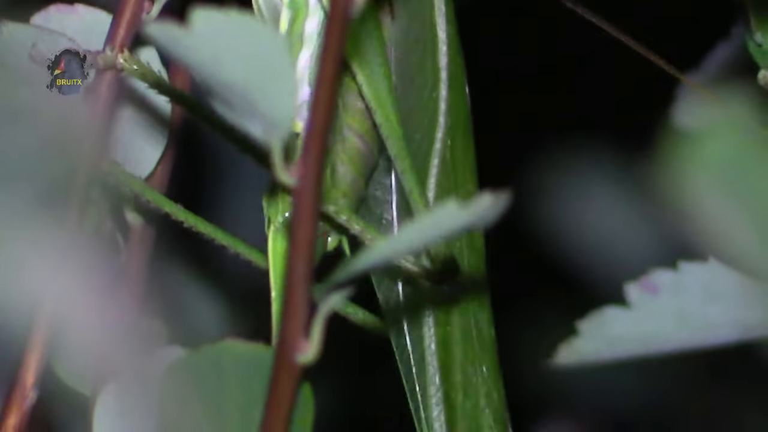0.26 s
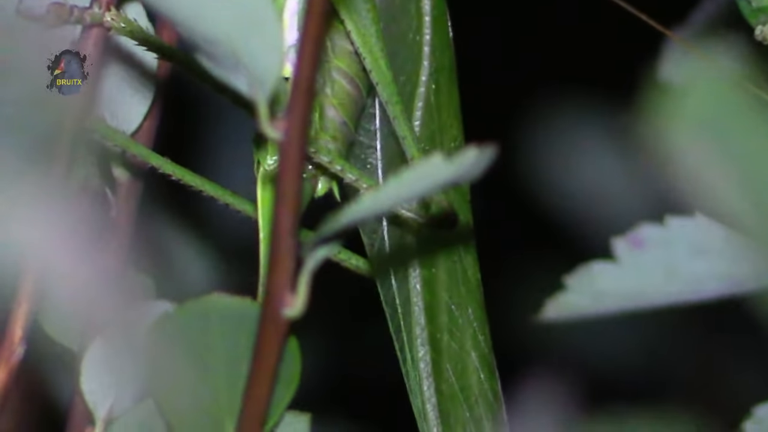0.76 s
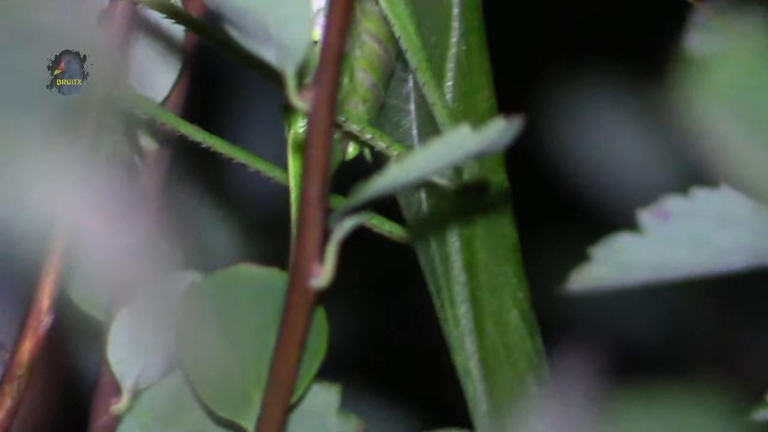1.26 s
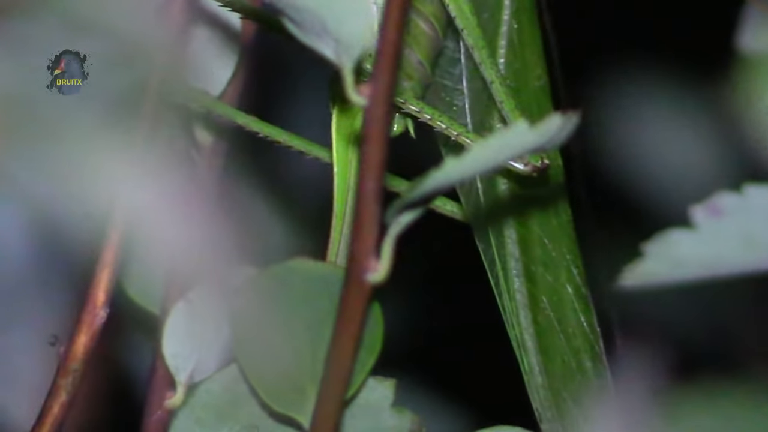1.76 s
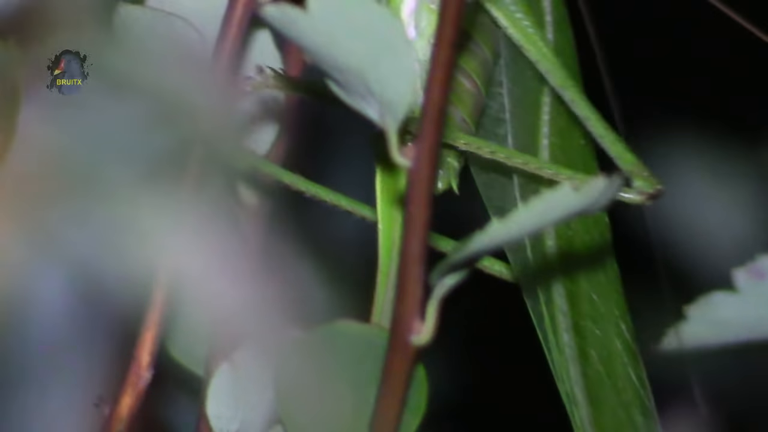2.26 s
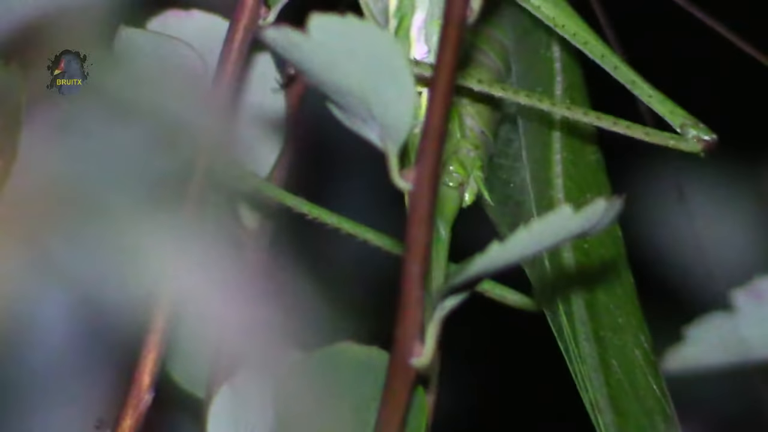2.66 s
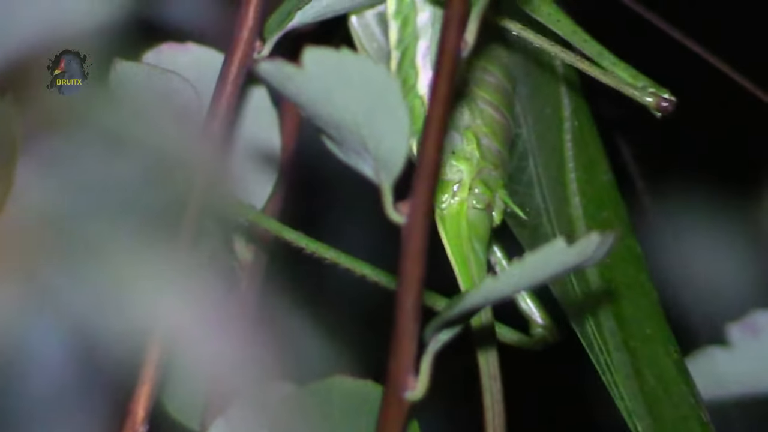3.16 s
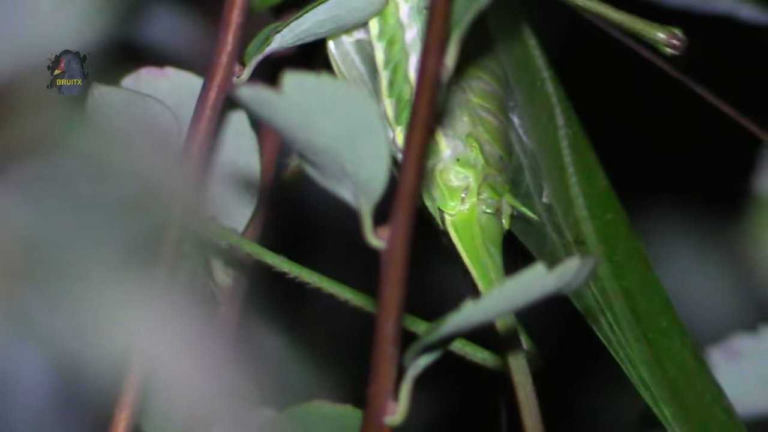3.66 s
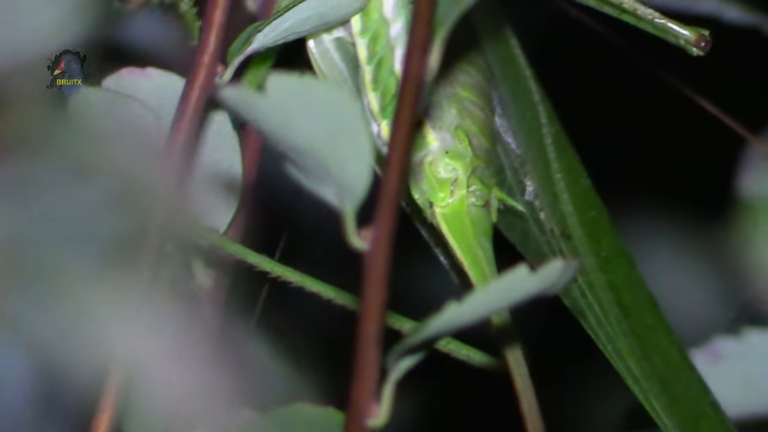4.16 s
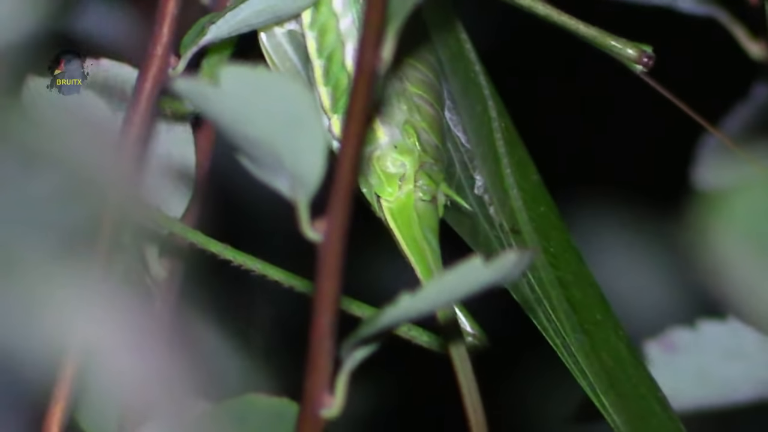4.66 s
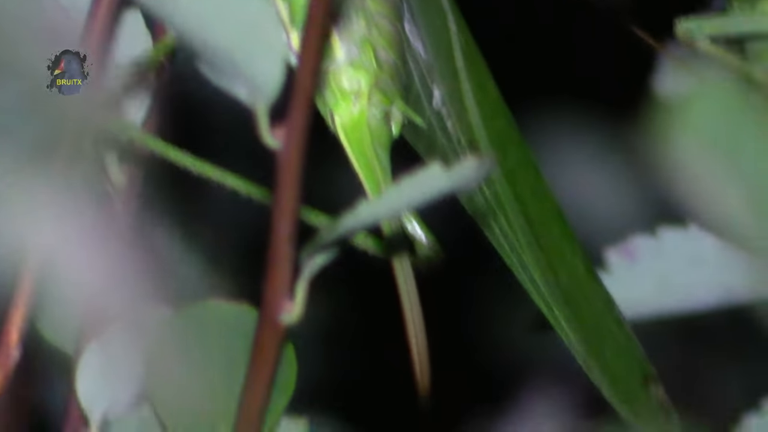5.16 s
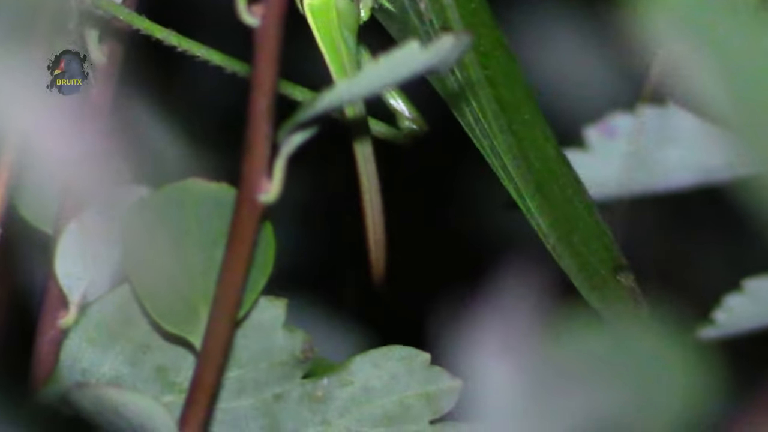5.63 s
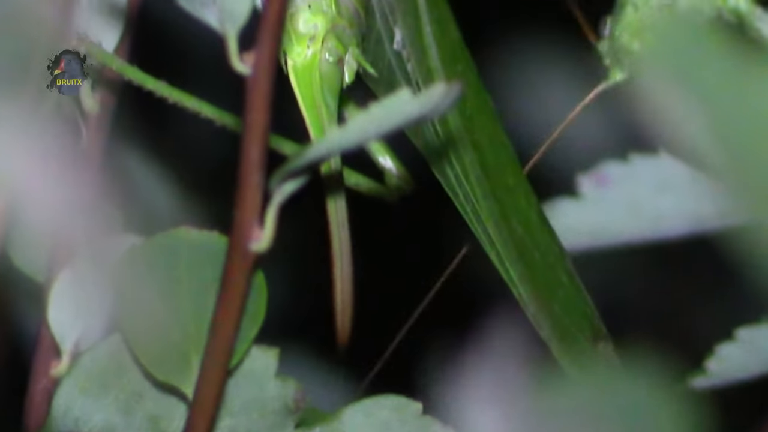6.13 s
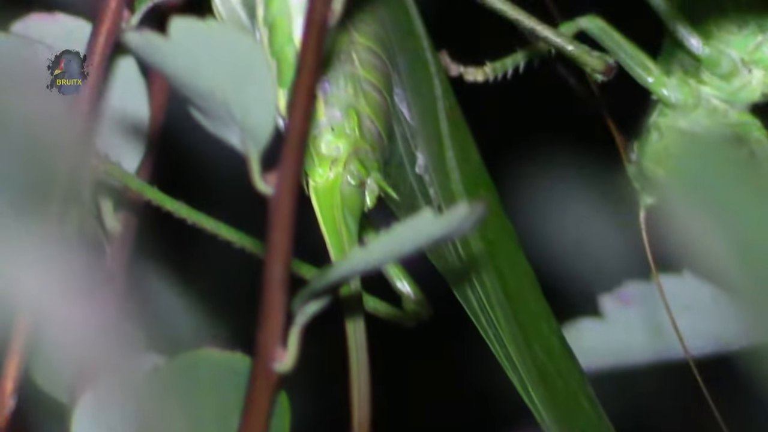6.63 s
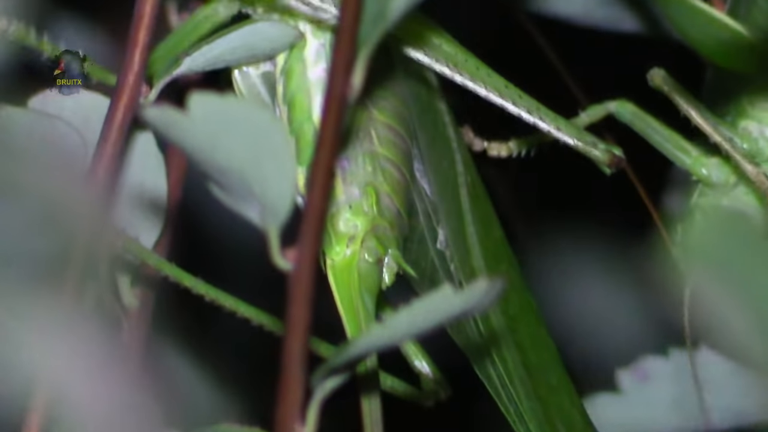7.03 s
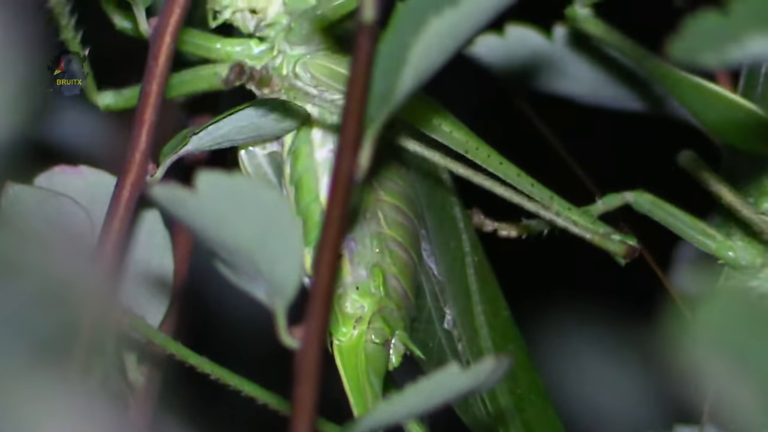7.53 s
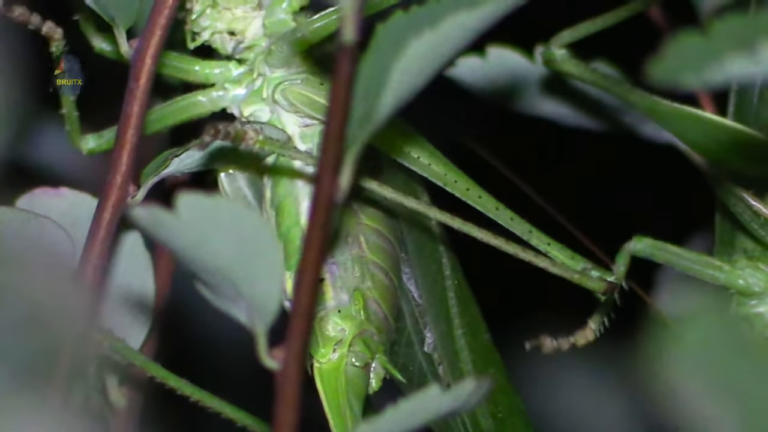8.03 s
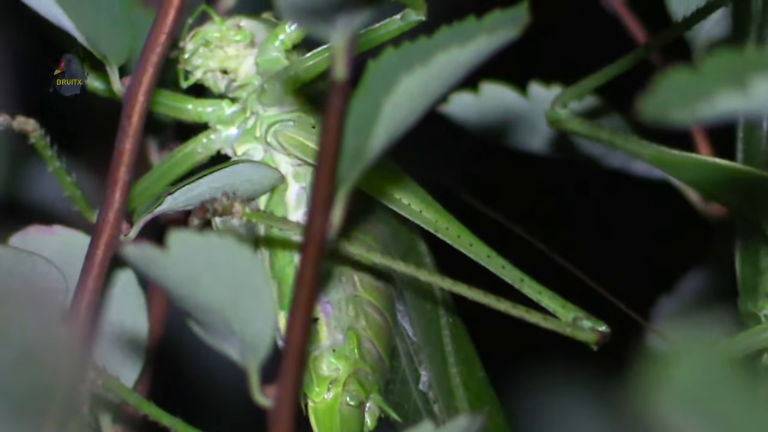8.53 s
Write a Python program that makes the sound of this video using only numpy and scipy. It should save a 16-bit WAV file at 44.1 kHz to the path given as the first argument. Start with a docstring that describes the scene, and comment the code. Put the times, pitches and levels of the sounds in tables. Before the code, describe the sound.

Night hedge insects: eight blasting paired rasps right at the microphone, then steady faint high buzzing with low, pure pulsing chirps that grow stronger.

```python
"""A bush-cricket right at the microphone rasps eight double strokes and stops, in a hedge at night; another
keeps on further off. Their rasps are scraper snaps on a toothed file, sent through a resonant wing.
Cone-head bush-crickets hold a high buzz of fused strokes; a tree cricket trills in soft, pure tone pulses.
Foliage scatters every song as decaying noise. A few faint twig ticks are knocks of banded noise.
A low distant rumble and a thin hiss, both shaped noise, lie under it all."""
import sys
import numpy as np
from scipy import signal
from scipy.fft import rfft, irfft, next_fast_len
from scipy.io import wavfile
from scipy.ndimage import uniform_filter1d, map_coordinates

SR = 44100
rng = np.random.default_rng(int(sys.argv[2]) if len(sys.argv) > 2 else 0)


def file_out(sig):
    """Save sig as 16-bit WAV at sys.argv[1]."""
    # one column per channel
    cols = np.atleast_2d(sig).T
    # limit, then scale
    lim = np.clip(cols, -1, 1)
    pcm = np.round(lim * 32767).astype(np.int16)
    wavfile.write(sys.argv[1], SR, pcm)


N = 387638  # length in samples
T = np.arange(N) / SR  # time in seconds


def amp(db):
    """Decibels to gain."""
    return 10 ** (np.asarray(db) / 20)


def unit(x):
    """Scaled to rms 1."""
    return x / np.sqrt(np.mean(x ** 2) + 1e-20)


def wobble(per_s):
    """A smooth random curve with the given number of random knots per second."""
    knots = rng.standard_normal(int(N * per_s / SR) + 4)
    return map_coordinates(knots, [T * per_s])


def ring(x, points, modes=()):
    """x through a causal, minimum-phase body with a (Hz, dB) response and sharp modes on top."""
    size = 2 * next_fast_len(N // 2 + SR // 4)
    hz = np.fft.rfftfreq(size, 1 / SR) + 1  # kept off zero for the logarithm
    f, db = np.transpose(points)
    # outside the listed range the response falls 40 dB per octave, by 60 dB at most
    inside = np.minimum(hz / f[0], f[-1] / hz).clip(None, 1)
    skirt = np.maximum(40 * np.log2(inside), -60)
    db = np.interp(np.log(hz), np.log(f), db) + skirt
    for centre, width, lift in modes:
        db = db + lift / (1 + (2 * (hz - centre) / width) ** 2)
    # folding the cepstrum forward gives the phase of a causal body
    cepstrum = irfft(np.log(amp(db)))
    cepstrum[1:size // 2] *= 2
    cepstrum[size // 2 + 1:] = 0
    response = np.exp(rfft(cepstrum))
    return irfft(rfft(x, size) * response)[:N]


def since(times):
    """Seconds from the nearest of the given moments (negative before it), and its index."""
    midpoints = (times[1:] + times[:-1]) / 2
    index = np.searchsorted(midpoints, T)
    return T - times[index], index


def beats(start, period, tire, count):
    """Times of a run of wing strokes that slows towards its end."""
    k = np.arange(count)
    return start + period * k * (1 + tire * (k / k[-1]) ** 2)


def strokes(times, width, edge, scatter_db):
    """Pressure of the scraper on the file: one rounded hump, width in seconds, per wing stroke."""
    dt, index = since(times)
    strength = amp(rng.normal(0, scatter_db, len(times)))
    return strength[index] / (1 + np.abs(2 * dt / width) ** edge)


def teeth(per_s, jitter, scatter_db):
    """The scraper snaps from tooth to tooth at an uneven rate and strength."""
    draws = rng.standard_normal((int(2 * per_s * N / SR), 2))
    gaps = np.exp(jitter * draws[:, 0])
    at = (np.cumsum(gaps) * SR / per_s).astype(int)
    snaps = amp(scatter_db * draws[:, 1])
    return unit(np.bincount(at, snaps, N)[:N])


def foliage(x, t60, delay):
    """Diffuse scatter from leaves and ground, drifting as the microphone moves."""
    t = np.arange(SR // 2) / SR
    knots = np.linspace(0, T[-1], num=9)
    # one decaying noise tail per knot, crossfaded from each to the next
    tails = rng.standard_normal((len(knots), len(t))) * amp(-60 * t / t60) * (t > delay)
    tails /= np.linalg.norm(tails, axis=1, keepdims=True)
    shares = np.sqrt(np.clip(1 - np.abs(T - knots[:, None]) / knots[1], 0, 1))
    return signal.fftconvolve(x * shares, tails, axes=1)[:, :N].sum(0)


# Distant rumble under the night. Each row: frequency in Hz, relative density in dB per Hz.
RUMBLE_SPECTRUM = [(22, -16), (40, -3), (68, 0), (100, 0.5), (157, -7), (210, -8.5), (364, -12.5),
                   (700, -15), (1230, -17.5), (2400, -22)]
# Thin hiss around the microphone. Each row: frequency in Hz, relative density in dB per Hz.
HISS_SPECTRUM = [(1900, -27.5), (2500, -2), (3500, -3.5), (5000, -6), (7500, -8.5), (16000, -7)]


def night_air():
    """A far, gently wavering rumble under a thin even hiss, both shaped from white noise."""
    rumble_db = -43.5 + 0.3 * wobble(7.4)
    rumble = amp(rumble_db) * unit(ring(rng.standard_normal(N), RUMBLE_SPECTRUM))
    hiss = amp(-51.5) * unit(ring(rng.standard_normal(N), HISS_SPECTRUM))
    return rumble + hiss


# Cone-heads in the hedge. Each row: wing strokes per second, mean level in dB.
CONEHEADS = [(86.7, -44.5), (93.2, -48)]
# Their wing as it reaches the microphone. Each row: frequency in Hz, relative response in dB.
CONEHEAD_WING = [(11500, -32), (13100, -19), (13650, -3), (13900, -11), (14400, 1), (15000, -6),
                 (15700, -3.5)]


def coneheads():
    """Wing strokes so fast that they fuse into a buzz at the top of hearing."""
    buzz = np.zeros(N)
    for rate, db in CONEHEADS:
        times = np.arange(rng.random(), T[-1] * rate + 1) / rate
        scrape = teeth(per_s=6000, jitter=.3, scatter_db=2)
        rasp = strokes(times, width=0.0055, edge=4, scatter_db=0.5) * scrape
        rasp = rasp + amp(.8) * foliage(rasp, t60=0.21, delay=.003)
        buzz += amp(db + .15 * wobble(1.42)) * unit(ring(rasp, CONEHEAD_WING))
    return buzz


# Wing of the singer further off, heard through the hedge. Each row: frequency in Hz, relative response in dB.
FAR_WING = [(6500, -38), (8000, -22.5), (8850, -11.5), (9350, -1), (9700, 0.5), (10030, -0.5),
            (10400, -2.5), (10900, 0), (11400, -8), (12300, -13), (13500, -20), (16000, -25)]
# Its wing resonance, for the direct sound only. Each row: frequency in Hz, width in Hz, lift in dB.
FAR_WING_MODES = [(10060, 520, 12.5)]
# its almost tireless beat: first stroke (s), period (s), share by which it falls behind by the end
FAR_START_S, FAR_PERIOD_S, FAR_TIRE = .0045, .08862, .0009
FAR_SECOND_S = .028  # from the first closing of a double stroke to the second
FAR_DB, FAR_DRIFT_DB = -43, 0.1  # its rms level, and the size of its slow random drift


def far_bush_cricket():
    """Double closing strokes, about eleven pairs a second, blurred by scatter in the hedge."""
    first = beats(FAR_START_S, FAR_PERIOD_S, FAR_TIRE, count=100)
    second = first + FAR_SECOND_S
    pressure = strokes(first, width=0.013, edge=3.2, scatter_db=0.1)
    pressure = pressure + amp(-0.1) * strokes(second, width=0.012, edge=3.7, scatter_db=0.5)
    rasp = pressure * teeth(per_s=1800, jitter=.25, scatter_db=-1.5)
    direct = unit(ring(rasp, FAR_WING, FAR_WING_MODES))
    short_scatter = foliage(rasp, t60=0.082, delay=0.0022)
    long_scatter = amp(-2.5) * foliage(rasp, t60=0.43, delay=0.0084)
    scattered = unit(ring(short_scatter + long_scatter, FAR_WING))
    return amp(FAR_DB + FAR_DRIFT_DB * wobble(1)) * unit(direct + amp(-0.5) * scattered)


# Wing of the singer right at the microphone. Each row: frequency in Hz, relative response in dB.
NEAR_WING = [(300, -29.5), (1200, -39.5), (3500, -28), (5500, -30.5), (7200, -17), (8400, -2.5),
             (10000, -0.5), (11200, -3), (12300, -5.5), (13500, -14.5), (15500, -17.5)]
# Sharp resonances of that wing. Each row: frequency in Hz, width in Hz, lift in dB.
NEAR_WING_MODES = [(9210, 190, 6.1), (9710, 190, 3.4), (10350, 210, 12.4)]
# its beat: first stroke (s), period (s), share by which it falls behind by the end
NEAR_START_S, NEAR_PERIOD_S, NEAR_TIRE = .0228, .0853, .051
NEAR_SECOND_S = .03  # from the first closing of a double stroke to the second


def near_bush_cricket():
    """Short and long closing rasps in pairs, each rasp after a faint rising squeak as the wings open."""
    first = beats(NEAR_START_S, NEAR_PERIOD_S, NEAR_TIRE, count=8)
    second = first + NEAR_SECOND_S
    pressure = strokes(first, width=0.012, edge=3.5, scatter_db=1.0)
    pressure = pressure + strokes(second, width=0.016, edge=5.7, scatter_db=0.0)
    snaps = teeth(per_s=1450, jitter=.22, scatter_db=5.5)
    rasp = ring(pressure * snaps, NEAR_WING, NEAR_WING_MODES)
    # the rasp's overall level is set 3 dB under that of its pressure
    rasp *= amp(-3.0) * np.linalg.norm(pressure) / np.linalg.norm(rasp)
    song = rasp
    for opening in (first - .024, second - .016):
        dt = np.clip(since(opening)[0], -.01, .004)
        squeak_hz = 8000 + 170000 * dt + 380 * wobble(1500)
        rub = strokes(opening, width=0.0042, edge=3.7, scatter_db=5.5) * amp(1.9 * wobble(1100))
        song = song + amp(-21.5) * rub * np.sin(2 * np.pi * np.cumsum(squeak_hz) / SR)
    short_scatter = amp(-15.5) * foliage(song, t60=0.067, delay=.003)
    long_scatter = amp(-27) * foliage(song, t60=0.2, delay=0.019)
    return song + short_scatter + long_scatter


# Trills of the tree cricket beneath the others. Each row: first pulse in seconds, last pulse in seconds,
# full level in dB, dB by which it starts softer (negative: louder).
TRILLS = [(0.03, 0.34, -38.5, -2.5), (0.586, 1.156, -36.5, 0.5), (1.415, 2.13, -39.5, 0.5),
          (2.325, 2.955, -41.5, -0.5), (3.125, 3.784, -37.5, 3), (3.975, 4.638, -38, -1),
          (4.872, 5.662, -30, 13), (5.914, 6.514, -29.5, 3), (6.775, 7.371, -27, 3),
          (7.617, 8.149, -27.5, 0.5), (8.369, 8.774, -28, 2)]
TRILL_PERIOD = .0314  # nominal seconds from pulse to pulse
SWELL_S = 0.25  # time constant with which a trill reaches its full level


def trill_level():
    """Level in dB: each trill eases from its starting level to its own full strength."""
    start, _, full_db, soft_db = np.transpose(TRILLS)
    trill = np.searchsorted(start[1:] - TRILL_PERIOD, T)
    elapsed = np.maximum(T - start[trill], 0)
    return full_db[trill] - soft_db[trill] * np.exp(-elapsed / SWELL_S)


def tree_cricket():
    """Pure pulses, each sagging in pitch as the wing slows; the wider surroundings answer at a steady level."""
    times = []
    for start, end, _, _ in TRILLS:
        u = np.linspace(0, 1, round((end - start) / TRILL_PERIOD) + 1)
        # the beat tires through each trill
        times.extend(start + (end - start) * (u - .015 * u * (1 - u)))
    times = np.array(times)
    dt, pulse = since(times)
    dt = np.clip(dt, -TRILL_PERIOD / 2, TRILL_PERIOD / 2)
    pitch_hz = 2872 - 6500 * dt + 8 * wobble(5) + 16 * wobble(400)
    # the wing starts each stroke a little out of step with the last
    slip = uniform_filter1d(0.74 * rng.standard_normal(len(times))[pulse], size=100)
    phase = 2 * np.pi * np.cumsum(pitch_hz) / SR + slip
    pressure = strokes(times, width=0.016, edge=5.9, scatter_db=.5) * amp(0.95 * wobble(400))
    song = pressure * (np.sin(phase) + amp(-36) * np.sin(2 * phase))
    direct = amp(trill_level()) * song
    # two echoes land in the gaps between the pulses; only the near one follows the trill's level
    near_echo = amp(-21.5) * np.interp(T - .0175, T, direct, left=0)
    far_echo = amp(-46.0) * np.interp(T - .049, T, song, left=0)
    scatter = amp(-43.0) * foliage(song, t60=0.24, delay=0.0093)
    return direct + near_echo + far_echo + scatter


# Faint ticks of twigs and leaves. Each row: start in seconds, pitch in Hz, starting level in dB.
TICKS = [(2.375, 1520, -47.5), (4.97, 1560, -51), (6.008, 1000, -38)]


def twigs():
    """Small dry ticks, each a short damped knock of noise banded around its pitch."""
    t60 = .07  # seconds to fall by 60 dB
    out = np.zeros(N)
    for s, hz, db in TICKS:
        band = [(0.62 * hz, -3), (hz, 0), (1.2 * hz, -3)]
        knock = unit(ring(rng.standard_normal(N), band))
        out += amp(db - 60 * np.abs(T - s) / t60) * (T > s) * knock
    return out


def scene():
    """All the singers and the twigs over the night air, in one channel."""
    singers = coneheads() + far_bush_cricket() + near_bush_cricket() + tree_cricket()
    return (night_air() + singers + twigs())[None]


TOP_HZ = 15780  # band limit


def record(dry):
    """The nearest rasps saturate the microphone input; nothing is kept above the band limit."""
    top, hardness = .76, 5  # saturation ceiling, sharpness of its knee
    x = dry / (1 + np.abs(dry / top) ** hardness) ** (1 / hardness)
    size = next_fast_len(N + SR // 4)
    passed = np.fft.rfftfreq(size, 1 / SR) < TOP_HZ
    return irfft(rfft(x, size) * passed, size)[:, :N]


dry = scene()
out = record(dry)
file_out(out)
```